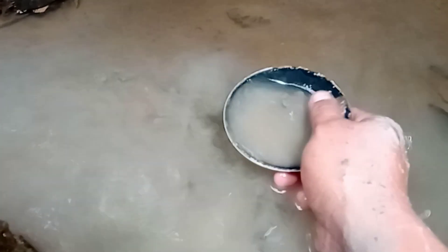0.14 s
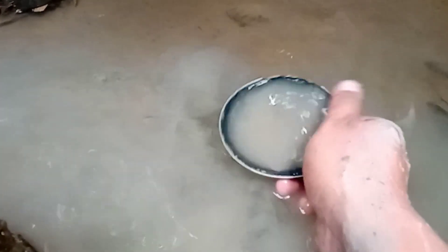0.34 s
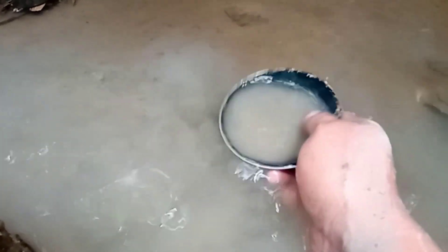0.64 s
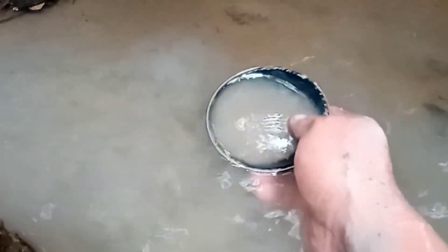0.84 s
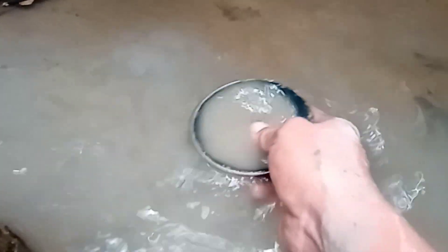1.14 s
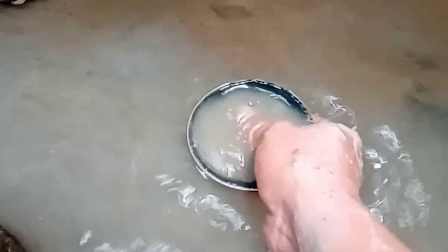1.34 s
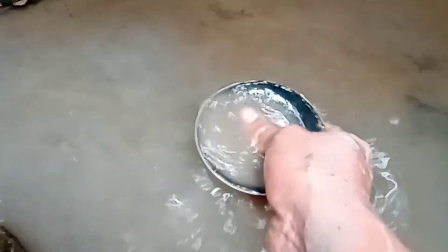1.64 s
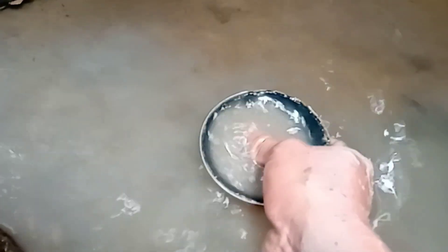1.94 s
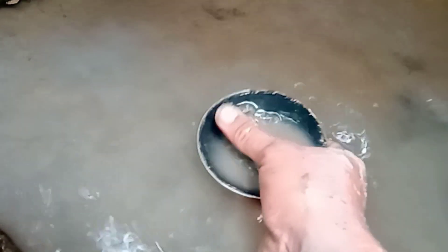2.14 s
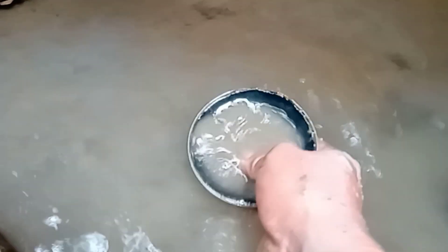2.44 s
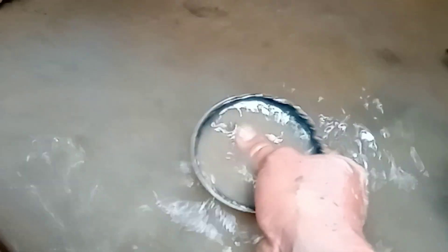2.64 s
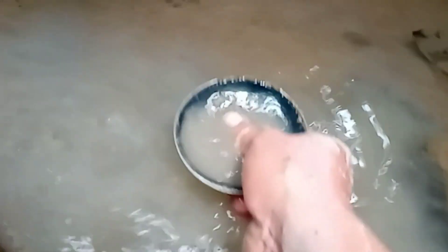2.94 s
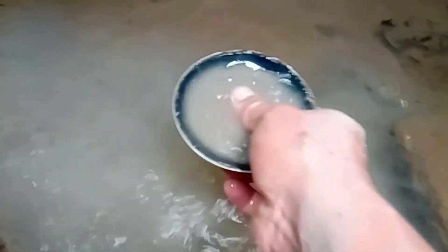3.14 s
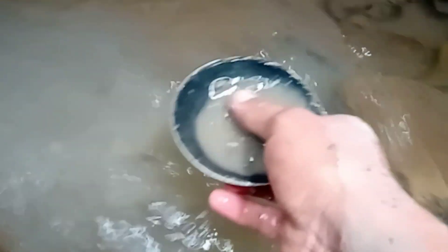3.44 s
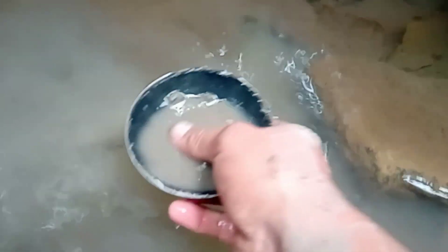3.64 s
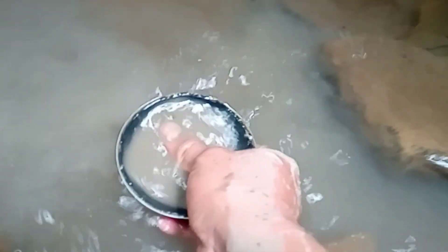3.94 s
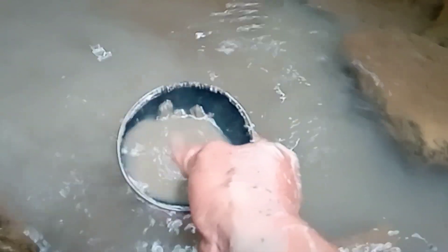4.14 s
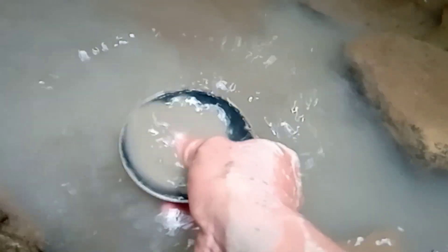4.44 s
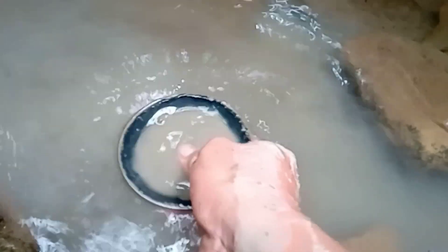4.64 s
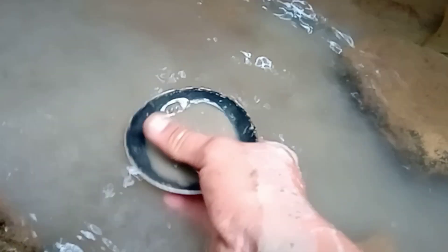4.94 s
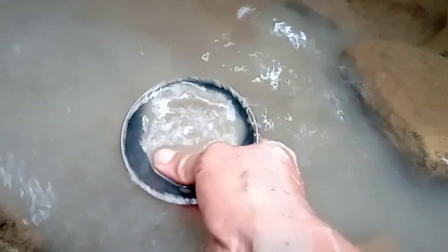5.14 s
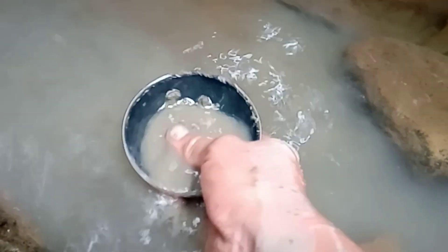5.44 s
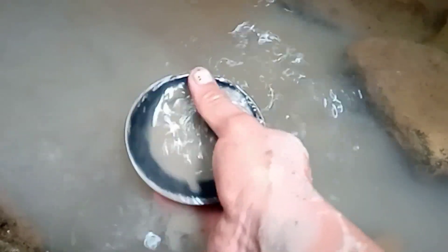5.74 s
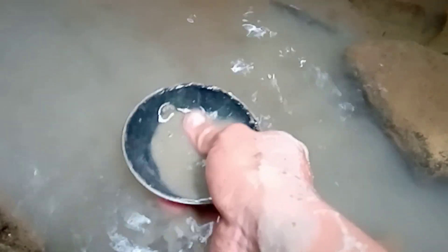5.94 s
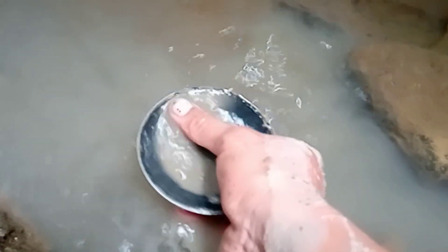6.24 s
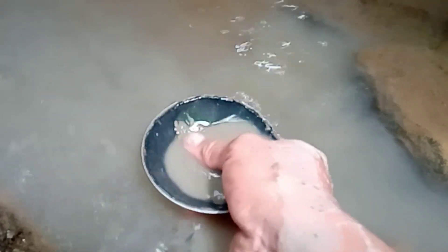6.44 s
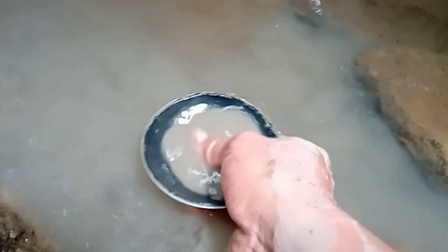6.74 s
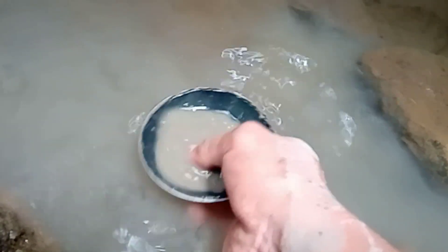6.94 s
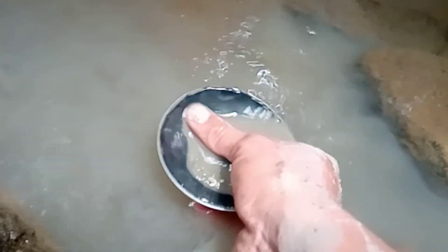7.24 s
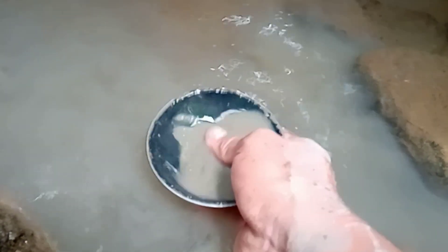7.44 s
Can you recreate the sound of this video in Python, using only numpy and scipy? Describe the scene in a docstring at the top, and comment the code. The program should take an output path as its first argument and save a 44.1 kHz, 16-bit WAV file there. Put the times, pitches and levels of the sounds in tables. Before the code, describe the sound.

A hand swirls a small pan in a shallow muddy creek. Steady bubbly trickling continues throughout, while water laps the pan several times a second with hollow gulps, plops and bright drips. Near the middle, a steel tool scrapes and rings through gravel, ending in dull stone knocks and a splash. Swirling then resumes with stronger plops. Close microphone outdoors, with short echoes from rocky banks.

```python
"""A small gold pan is swirled in a shallow muddy creek between rock banks that echo.
Throughout, swarms of ringing bubbles make the creek trickle, and spills off pan and hand make it surge.
From the start, water laps the pan a few times a second, drums on trapped air (noise clicks through
resonances) and leaves plopping bubbles, while drops fall back as short rings amid a spatter.
Near the middle a steel tool judders through gravel, its modes ringing, ending in dull knocks and a splash."""
import sys
import numpy as np
from scipy import signal
from scipy.fft import rfft, irfft
from scipy.io import wavfile
from scipy.ndimage import uniform_filter1d

SR = 44100
rng = np.random.default_rng(int(sys.argv[2]) if len(sys.argv) > 2 else 0)


def store_pcm(level_fs):
    """Save levels as 16-bit WAV."""
    pcm = np.round(np.clip(level_fs, -1, 1) * 32767).astype(np.int16)
    wavfile.write(sys.argv[1], SR, np.atleast_2d(pcm).T)


N = 335160
TIME_S = np.arange(N) / SR

# spectrum of running water: pitch_hz, density_db_per_hz
CREEK_SPECTRUM = [(500, -37.5), (800, -15), (1100, -9.5), (1500, -8.5), (2000, -7), (2550, 1), (3100, 3),
                  (3600, -3), (4600, 4.5), (5400, 0), (6700, -4.5), (7500, -12), (8300, -34.5)]


def amp(db):
    """Decibels to amplitude."""
    return 10 ** (np.asarray(db) / 20)


def unit_rms(x):
    """Scale to an RMS of 1."""
    return x / np.sqrt(np.mean(x ** 2) + 1e-20)


def read(points, hz):
    """Interpolate a table of (Hz, value) over log frequency."""
    f, value = np.transpose(points)
    return np.interp(np.log(hz + 1), np.log(f + 1), value)


def add(mix, start_s, sound):
    """Mix a sound in from a given moment."""
    part = mix[max(round(start_s * SR), 0):][:len(sound)]
    part += sound[:len(part)]


def above(x, hz):
    """Steep high-pass."""
    return signal.sosfilt(signal.butter(6, hz, "high", fs=SR, output="sos"), x)


def coloured(x, spectrum):
    """Filter by a spectrum table, then scale to RMS 1."""
    gain = amp(read(spectrum, np.fft.rfftfreq(len(x), 1 / SR)))
    return unit_rms(irfft(rfft(x) * gain, len(x)))


def resonate(x, hz, width_hz):
    """A resonance of gain 1 that follows the curve hz: shift to 0 Hz, smooth, shift back."""
    turn = np.exp(2j * np.pi * np.cumsum(hz * np.ones(len(x))) / SR)
    r = np.exp(-np.pi * width_hz / SR)
    return 2 * (turn * signal.lfilter([1 - r], [1, -r], x / turn + 1e-18)).real


def steadied(x, size):
    """Level 1 over each stretch of size samples, with the finer grain kept."""
    power = uniform_filter1d(uniform_filter1d(x ** 2, size), size)
    return x / np.sqrt(abs(power) + 1e-12)


def wobble(count, size):
    """Random wavering of RMS 1, smoothed over size samples."""
    return unit_rms(uniform_filter1d(rng.standard_normal(count), size))


def swell(start_s, length_s, rise_s, fall_s):
    """Attack, hold and release of one movement of the water."""
    age_s = TIME_S - start_s
    attack = np.clip(age_s / rise_s + .5, 0, 1)
    return attack * np.exp(-np.clip((age_s - length_s) / fall_s, 0, 20))


def patter(per_s, spread_db, count=16000):
    """Clicks of either sign at random moments, their levels spread exponentially."""
    moment, chance, size, sign = rng.random((count, 4)).T
    click = amp(spread_db * np.minimum(-np.log(1 - size), 3)) * np.sign(sign - .5)
    kept = chance < per_s * N / SR / count
    return np.bincount((moment * N).astype(int), click * kept, N)


def bubble(hz, cycles, rise):
    """A trapped bubble decays by 1/e in some cycles and rises in pitch as it nears the surface."""
    age = np.arange(int(6 * cycles / hz * SR)) * hz / SR  # in cycles
    tone = np.sin(2 * np.pi * age * (1 + rise * age / cycles / 2))
    return tone * np.exp(-age / cycles) * (1 - np.exp(-1.9 * age))


def scattered(x, share, fade_s, count=12):
    """Near walls and the water surface repeat a sound within a few hundredths of a second."""
    delay_s, sign = rng.uniform(.002, .03, count), rng.choice([-1, 1], count)
    taps = np.zeros(SR // 20)
    taps[(delay_s * SR).astype(int)] = share * unit_rms(sign * np.exp(-delay_s / fade_s)) / np.sqrt(count)
    taps[0] = 1  # direct sound
    return signal.fftconvolve(x, taps)


def banks(x):
    """Sparse echoes from the rock, each band dying at its own rate."""
    # pitch_hz, t60_s
    rock_decay = [(300, 0.35), (1000, 0.47), (3000, 0.39), (8000, 0.2)]
    taps = rng.choice([-1., 1.], SR // 2) * (rng.random(SR // 2) < .08)
    taps[:SR // 200] = 0  # no echo in the first 5 ms
    hz, t_s, z = signal.stft(taps, SR, nperseg=256)
    decay = amp(-60 * t_s / read(rock_decay, hz)[:, None])
    tail = signal.istft(z * decay, SR, nperseg=256)[1]
    return signal.fftconvolve(x, tail / np.linalg.norm(tail))[:N]


def swarm(low_hz, high_hz, per_s, spread_db, low_cycles, count=140):
    """Bubbles over a range of sizes, each with its own upward chirp and close echoes."""
    out, rings = np.zeros(N), []
    chirp = 0.045  # mean share by which pitch rises per decay time, before the cap
    for hz, rise in zip(np.linspace(low_hz, high_hz, count), rng.exponential(chirp, count)):
        ring = bubble(hz, low_cycles * np.sqrt(hz / low_hz), min(rise, 2 * chirp))
        ring = scattered(ring, share=0.99, fade_s=0.0039)
        rings.append(ring / np.linalg.norm(ring))
    births, kind = patter(per_s, spread_db), rng.integers(0, count, N)
    for at in np.flatnonzero(births):
        add(out, at / SR, births[at] * rings[kind[at]])
    return unit_rms(out)


def clumps(per_s, fade_s, depth):
    """Little waves break at random; each throws up a crowd of bubbles that thins out."""
    breaks = abs(patter(per_s, spread_db=3.0))
    crowd = signal.lfilter([1], [1, -np.exp(-1 / (fade_s * SR))], breaks)
    return 1 + depth * unit_rms(uniform_filter1d(crowd, size=130))


def hush():
    """The creek further off: steady coloured noise."""
    # pitch_hz, density_db_per_hz
    far_spectrum = [(25, -26.5), (60, -26), (130, -14.5), (280, -15.5), (450, -11), (820, -11), (1200, 2.5),
                    (4000, 3.5), (7000, -7), (8200, -20.5)]
    return amp(-55.5) * coloured(rng.standard_normal(N), far_spectrum)


def spilling():
    """Levels of trickle and spray: steady creek plus surges off pan and hand, summed as power."""
    # start_s, length_s, trickle_db, spray_db
    spills = [(0.186, 0.078, -52.5, -59), (0.694, 0.12, -57.5, -57.5), (1.3, 0.17, -65, -58),
              (1.656, 0.19, -57, -53), (1.933, 0.12, -52.5, -54), (2.163, 0.36, -56, -62),
              (2.753, 0.058, -52.5, -50), (2.944, 0.24, -50.5, -55.5), (3.604, 0.033, -52, -52.5),
              (3.857, 0.13, -49, -53.5), (4.835, 0.23, -54, -58), (5.222, 0.15, -53, -59),
              (5.615, 0.15, -53.5, -56), (6.202, 0.047, -52.5, -51), (6.35, 0.26, -54, -57.5),
              (6.645, 0.37, -56.5, -57.5), (7.312, 0.37, -54, -80)]
    flow, spray = amp(-52.5) ** 2, amp(-55) ** 2  # steady creek
    for start_s, length_s, trickle_db, spray_db in spills:
        surge = swell(start_s, length_s, rise_s=0.027, fall_s=0.032)
        flow = flow + (amp(trickle_db) * surge) ** 2
        spray = spray + (amp(spray_db) * surge) ** 2
    return np.sqrt(flow), np.sqrt(spray)


def trickle():
    """Bubbles of three size ranges, and dry ticks, come in clumps; low and high bands surge apart."""
    large = swarm(930, 2107, per_s=270, spread_db=4.0, low_cycles=8.5)
    large = large * clumps(per_s=53, fade_s=0.018, depth=0.98)
    middling = swarm(2050, 3800, per_s=300, spread_db=4.0, low_cycles=9.0)
    middling = middling * clumps(per_s=23, fade_s=0.016, depth=0.35)
    small = swarm(3750, 7400, per_s=900, spread_db=5.5, low_cycles=11.0)
    small = small * clumps(per_s=16, fade_s=0.01, depth=0.98)
    ticks = amp(-12.0) * unit_rms(patter(per_s=600, spread_db=-1.0))
    fizz = unit_rms(large + middling + small) + ticks
    fizz = fizz * clumps(per_s=36, fade_s=0.008, depth=0.37)
    fizz = coloured(fizz + amp(-13.0) * banks(fizz), CREEK_SPECTRUM)
    body = signal.sosfiltfilt(signal.butter(4, 3650, fs=SR, output="sos"), fizz)
    treble = fizz - body
    body = above(above(body, hz=845), hz=845)
    flow, spray = spilling()
    return flow * steadied(body, size=3000) + spray * steadied(treble, size=3000)


def thumps():
    """Short swells of low rumble: twice-resonated noise under a bell-shaped envelope."""
    # centre_s, level_db, pitch_hz, length_s
    rumbles = [(1.095, -71, 62, 0.023), (1.75, -73, 72, 0.025), (2.888, -69, 89.5, 0.046),
               (3.2, -55, 240, 0.034), (3.505, -50.5, 133, 0.023), (3.997, -75, 84, 0.067),
               (7.013, -72, 123, 0.017)]
    out, t_s = np.zeros(N), np.arange(-SR // 4, SR // 4) / SR
    for centre_s, db, hz, length_s in rumbles:
        rumble = resonate(rng.standard_normal(len(t_s)), hz, width_hz=0.8 * hz)
        rumble = resonate(rumble, hz, width_hz=1.3 * hz)
        rumble = steadied(above(rumble, 0.39 * hz), size=1200)
        add(out, centre_s + t_s[0], amp(db) * rumble * np.exp(-(t_s / length_s) ** 2))
    return out


def drips():
    """A drop leaves a small ringing bubble amid a noise spatter around the same pitch."""
    # start_s, bubble_db, pitch_hz, spatter_db
    drops = [(0.107, -45, 4900, -50), (0.1404, -41, 4720, -45), (0.1888, -36, 2055, -47),
             (0.201, -40, 3080, -36.5), (0.275, -36, 2900, -44), (0.286, -40, 2620, -51),
             (0.3283, -35.5, 5630, -44), (0.447, -40, 2760, -41.5), (0.541, -44, 3100, -37.5),
             (0.5584, -32, 2650, -38), (0.746, -39, 4800, -40), (0.8317, -37, 6550, -46),
             (0.833, -35, 2870, -38.5), (1, -32, 3490, -42), (1.11, -41, 1860, -42.5),
             (1.152, -34.5, 5170, -48), (1.223, -34.5, 4730, -53), (1.407, -35.5, 1990, -57),
             (1.459, -41.5, 2750, -37.5), (1.5547, -38, 4500, -42.5), (1.762, -46, 3300, -42),
             (2.2744, -35.5, 3650, -46), (2.406, -34, 5100, -31.5), (2.799, -30.5, 2700, -38),
             (2.7985, -30.5, 3300, -44), (2.805, -31, 3950, -51), (2.8757, -32.5, 2740, -41),
             (3.6116, -34.5, 2430, -53), (3.776, -41.5, 1520, -50), (3.956, -30, 4940, -51),
             (4.067, -34, 2150, -47), (4.206, -36.5, 4540, -39.5), (4.3736, -32.5, 2674, -45),
             (4.506, -36.5, 2870, -50), (4.774, -37, 4740, -40), (4.859, -35.5, 2970, -46),
             (4.971, -38, 3700, -52.5), (5.074, -37, 4550, -42), (5.204, -37, 2390, -38),
             (5.439, -34, 2690, -61), (5.6162, -34.5, 4730, -45), (5.919, -34, 4780, -36),
             (5.999, -41, 4450, -35.5), (6.1615, -35.5, 2460, -49), (6.252, -38.5, 2490, -47),
             (6.2922, -27.5, 4270, -39.5), (6.412, -41, 1247, -43), (6.455, -35.5, 5000, -54),
             (6.496, -39, 2580, -48), (6.5604, -40.5, 2430, -38.5), (6.686, -37, 4320, -38.5),
             (6.719, -40, 2650, -36.5), (6.9253, -34.5, 3980, -40), (6.966, -35.5, 2580, -41),
             (7.1732, -31, 4430, -58), (7.257, -33, 4750, -50)]
    rise_s, fade_s = 0.0007, 0.0058
    out, t_s = np.zeros(N), np.arange(SR // 20) / SR
    envelope = np.exp(-t_s / fade_s) * (1 - np.exp(-t_s / rise_s))
    for start_s, db, hz, spatter_db in drops:
        spatter = resonate(rng.standard_normal(len(t_s)), hz, width_hz=2000)
        add(out, start_s, amp(spatter_db) * coloured(spatter, CREEK_SPECTRUM) * envelope)
        ring = scattered(bubble(hz, cycles=8.1, rise=0.015), share=0.88, fade_s=0.0056)
        add(out, start_s, amp(db) * ring)
    return above(out, hz=840)


def knocks():
    """Stones knock together, their ring smothered by the water to a few cycles."""
    # dull knocks of shifted stones: start_s, level_db, pitch_hz, ring_cycles
    stones = [(3.31, -38, 237, 3), (3.4879, -35, 290, 1.7), (3.4965, -30.5, 268, 1.8)]
    out = np.zeros(N)
    for start_s, db, hz, cycles in stones:
        add(out, start_s, amp(db) * bubble(hz, cycles, rise=0))
    return out


def scrape():
    """Steel sticks and slips on gravel: slips crunch and feed the blade's modes, purer as it comes free."""
    # start_s, ring_db, grit_db, freedom_0_to_1, flex_db
    slips = [(3.061, -35, -49, 0.39, -3), (3.125, -44.5, -43.5, 0, 2), (3.186, -34, -39, 0, -8),
             (3.211, -32.5, -42, 0.13, -13), (3.264, -32.5, -41, 0.7, -15), (3.319, -31, -40, 0.9, -4.5),
             (3.383, -30, -42, 1, -12), (3.417, -28, -44, 1, -1.5)]
    # modes of the blade: pitch_hz, pressed_db, free_db, free_t60_s
    modes = [(228, -8, -27, .2), (705, -10, -26, .2), (874, -15, -15, .5), (1012, -6, -20, .2),
             (1277, -16, -8.5, .24), (2008, -13, -4, .21), (2068, -2, -11, .17), (2778, -11, -3, .19),
             (3024, -6, 0, .18), (3095, -4, -10, .1), (3620, -7, -18, .2), (4592, -5, -22, .2),
             (5025, -7, -24, .18), (5305, -10, -15, .12), (5848, -10, -22, .14)]
    # crunch of gravel: pitch_hz, density_db_per_hz
    grit_spectrum = [(100, -41), (220, 3), (700, 2.5), (1500, -8), (2500, 2.5), (4100, -11), (5400, -4.5),
                     (7000, -13), (8200, -33.5)]
    flex_hz, flex_octaves = 1277, 0.19  # band whose level depends on where a slip catches the blade
    grind_hz, free_waver_hz = 45, 7  # RMS waver: extra at the top mode fully pressed, and always
    pressed_ring, chatter_depth = 0.5, 0.4  # share of free t60; RMS share fully pressed
    slip_rise_s = 0.006
    plunge_s, smother_cycles = 3.463, 58  # under water, high modes die first

    out, t_s = np.zeros(SR), np.arange(SR) / SR
    start_s, ring_db, grit_db, free, flex_db = np.transpose(slips)[:, :, None]
    first_s, free = slips[0][0], np.clip(free, 0, 1)
    clock_s = first_s + t_s
    age_s = np.maximum(clock_s - start_s, 0)  # one row per slip
    pressed = 1 - np.interp(clock_s, start_s[:, 0], free[:, 0])
    for hz, pressed_db, free_db, t60_s in modes:
        flex = flex_db * np.exp(-(np.log2(hz / flex_hz) / flex_octaves) ** 2)
        ring_t60_s = t60_s * (pressed_ring + free * (1 - pressed_ring))  # gravel shortens the ring
        fade = np.exp(-np.log(1000) * age_s / ring_t60_s)
        level_db = ring_db + pressed_db + free * (free_db - pressed_db) + flex
        fed = amp(level_db) * (1 - np.exp(-age_s / slip_rise_s)) * fade
        waver_hz = (free_waver_hz + grind_hz * pressed * hz / modes[-1][0]) * wobble(len(t_s), size=150)
        # grains catch the edge and shake each mode
        chatter = 1 + chatter_depth * pressed * wobble(len(t_s), size=200)
        smother = np.exp(-np.maximum(clock_s - plunge_s, 0) * hz / smother_cycles)
        tone = np.sin(2 * np.pi * (np.cumsum(hz + waver_hz) / SR + rng.random()))
        out += np.linalg.norm(fed, axis=0) * chatter * smother * tone
    crunch = amp(grit_db) * np.exp(-age_s / 0.034) * (1 - np.exp(-age_s / 0.0011))
    grit = coloured(patter(per_s=1400, spread_db=3.0)[:len(t_s)], grit_spectrum)
    out += np.linalg.norm(crunch, axis=0) * grit
    placed = np.zeros(N)
    add(placed, first_s, out)
    return above(placed, hz=170)


def plops():
    """Each large bubble trapped by the lapping rings briefly, low and hollow, rising a little."""
    # start_s, level_db, pitch_hz, ring_cycles
    large_bubbles = [(0.206, -42.5, 464, 7.4), (0.373, -46.5, 500, 7.4), (0.624, -42, 822, 14),
                     (0.997, -34.5, 700, 2.1), (1.036, -34.5, 426, 4.4), (1.234, -39, 444, 6.9),
                     (1.3, -30.5, 636, 2.5), (1.455, -44, 640, 4.9), (1.563, -36.5, 465, 1.8),
                     (1.912, -45, 507, 8.6), (1.983, -40.5, 643, 6), (1.995, -39, 1079, 9.6),
                     (2.311, -33.5, 870, 2.3), (2.424, -35.5, 842, 4.6), (2.566, -40.5, 720, 3),
                     (2.617, -38, 465, 4.2), (2.884, -43, 817, 7.2), (3.061, -38.5, 700, 4.3),
                     (3.186, -38.5, 715, 3.4), (3.287, -41, 810, 18), (3.463, -39, 387, 5),
                     (3.473, -40.5, 857, 6.5), (3.482, -34.5, 660, 5), (3.496, -27.5, 422, 2.9),
                     (3.524, -30.5, 717, 5), (3.616, -35.5, 840, 4.5), (3.72, -32, 734, 8.2),
                     (3.93, -32.5, 748, 3), (4.007, -37, 1000, 3.8), (4.218, -49, 502, 4.4),
                     (4.342, -38.5, 786, 5), (4.599, -36.5, 730, 4.2), (4.84, -24, 685, 2.15),
                     (4.917, -33.5, 838, 7.2), (5.022, -31.5, 819, 5), (5.08, -37, 840, 5.6),
                     (5.323, -41, 785, 6), (5.365, -30, 832, 4.6), (5.524, -24.5, 727, 2.3),
                     (5.535, -24, 777, 2), (5.682, -37.5, 587, 3.4), (5.715, -36.5, 787, 4.3),
                     (5.744, -35, 827, 7), (6.168, -29.5, 844, 5.2), (6.19, -38.5, 480, 3.1),
                     (6.248, -41.5, 739, 10), (6.345, -35.5, 576, 4.7), (6.422, -35, 835, 5.6),
                     (6.495, -38, 900, 8), (6.769, -37, 642, 5.6), (6.865, -31, 855, 4.8),
                     (6.95, -40, 459, 3), (7.309, -31.5, 830, 9.1), (7.335, -32, 735, 4.4),
                     (7.42, -43, 810, 6)]
    out = np.zeros(N)
    for start_s, db, hz, cycles in large_bubbles:
        ring = scattered(bubble(hz, cycles, rise=0.02), share=0.51, fade_s=0.016)
        add(out, start_s, amp(db) * above(ring, 0.77 * hz))
    return out


def lapping():
    """What the laps do together: pitch of the air pocket, and strength of pocket, hollow and gurgle."""
    # start_s, length_s, open_pocket_hz, pocket_db, hollow_db, gurgle_db
    laps = [(0.0, 0.13, 468, -58, -81.5, -65), (0.152, 0.094, 452, -60.5, -91, -55),
            (0.35, 0.28, 455, -61, -86, -58), (0.71, 0.44, 557, -71, -86, -64),
            (1.181, 0.28, 455, -61, -80, -62.5), (1.562, 0.061, 430, -52.5, -65, -66),
            (1.666, 0.45, 437, -67, -87, -82), (1.968, 0.13, 455, -61, -84, -57),
            (2.112, 0.19, 400, -83, -71.5, -65), (2.328, 0.31, 449, -59, -87, -58.5),
            (2.701, 0.2, 460, -61, -76, -68), (2.935, 0.23, 417, -60, -78, -57),
            (3.464, 0.032, 472, -60, -47, -47), (3.573, 0.3, 448, -62.5, -62.5, -57),
            (3.88, 0.24, 525, -62.5, -70.5, -60.5), (4.164, 0.11, 471, -60, -72.5, -59),
            (4.297, 0.071, 684, -53, -95, -59), (4.436, 0.12, 525, -59, -68.5, -60.5),
            (4.61, 0.52, 523, -63, -95, -56.5), (5.17, 0.14, 533, -64.5, -75.5, -63.5),
            (5.307, 0.27, 512, -59, -72.5, -58), (5.644, 0.22, 483, -59, -70.5, -55.5),
            (5.889, 0.21, 525, -61.5, -86, -58.5), (6.159, 0.11, 464, -57.5, -76, -61),
            (6.297, 0.045, 484, -52.5, -57, -54.5), (6.411, 0.21, 740, -70, -90, -59),
            (6.559, 0.15, 486, -59, -84, -62), (6.722, 0.12, 548, -59.5, -85, -63),
            (6.959, 0.17, 485, -60.5, -90, -61), (7.108, 0.1, 646, -61.5, -92, -63),
            (7.259, 0.21, 503, -59, -66, -59), (7.513, 0.059, 484, -53.5, -57, -55)]
    pinch, open_s = 0.26, 0.0096  # the pocket starts higher by this share and sinks as it opens
    drum, hollow, gurgle = amp(-78.5) ** 2, 0, amp(-81) ** 2  # powers; ripples between the laps
    pitch = drum * 554  # Hz of the ripples, weighted by power
    for start_s, length_s, hz, pocket_db, hollow_db, gurgle_db in laps:
        lap = swell(start_s, length_s, rise_s=0.053, fall_s=0.04)
        power = (amp(pocket_db) * lap) ** 2
        closed = np.exp(-np.clip((TIME_S - start_s) / open_s, 0, 20))
        drum = drum + power
        hollow = hollow + (amp(hollow_db) * lap) ** 2
        gurgle = gurgle + (amp(gurgle_db) * lap) ** 2
        pitch = pitch + power * hz * (1 + pinch * closed)
    return pitch / drum, np.sqrt(drum), np.sqrt(hollow), np.sqrt(gurgle)


def cavity(hz, width_hz, per_s):
    """Little slaps of water drum on trapped air, which answers in one narrow band."""
    air = patter(per_s, spread_db=2.5)
    for _ in range(7):
        air = resonate(air, hz, width_hz)
    return steadied(air, size=3000)


def slosh():
    """Lapping water drums on an air pocket and a deeper hollow, and gurgles with middling bubbles."""
    pocket_hz, drumming, booming, gurgling = lapping()
    pocket_hz = pocket_hz * (1 + 0.045 * wobble(N, size=2500))  # the pocket keeps changing size
    pocket = cavity(pocket_hz, width_hz=210, per_s=170)
    hollow = cavity(324.4, width_hz=228, per_s=160)  # under the pan
    gurgle = above(swarm(530, 1020, per_s=110, spread_db=1.0, low_cycles=5.0), hz=510)
    return drumming * pocket + booming * hollow + gurgling * steadied(gurgle, size=2800)


def scene():
    """All layers; plops, drops and steel also echo off the banks."""
    gulps, drops = plops(), drips()
    steel = scrape() + knocks() + thumps()
    echo = banks(amp(-13.0) * gulps + amp(-11.5) * drops + amp(-15.5) * steel)
    return (gulps + drops + steel + echo + trickle() + slosh() + hush())[None]


def record(dry):
    """A steep low-pass at 8150 Hz; nothing is heard above it."""
    lowpass = signal.firwin(201, 8150, window=("kaiser", 8), fs=SR)
    return signal.oaconvolve(dry, lowpass[None], "same")


dry = scene()
out = record(dry)
store_pcm(out)
```